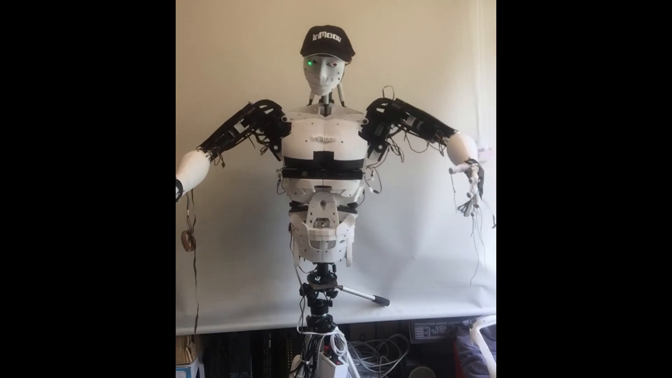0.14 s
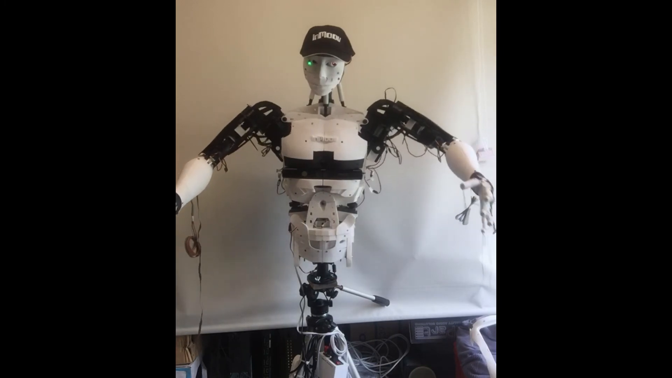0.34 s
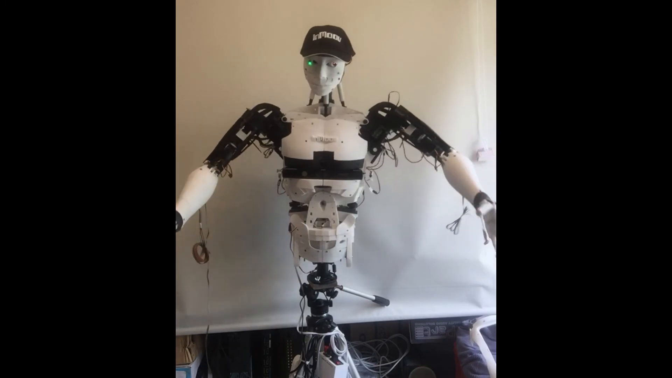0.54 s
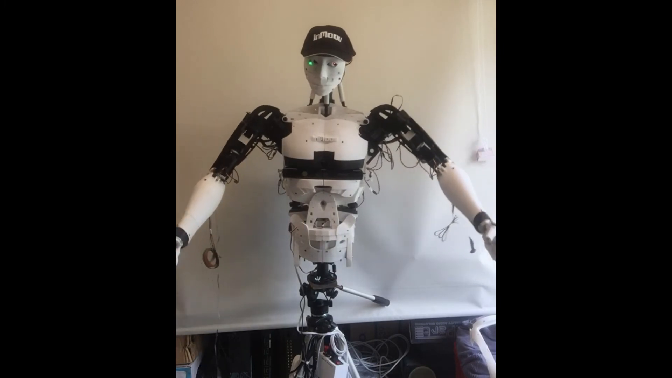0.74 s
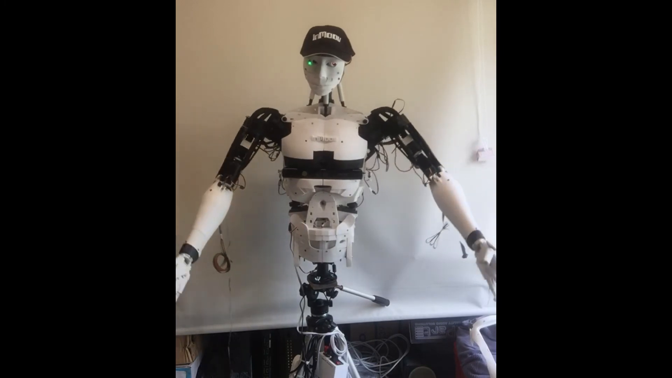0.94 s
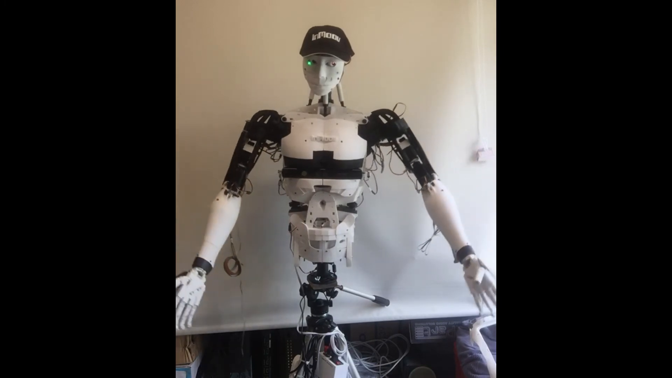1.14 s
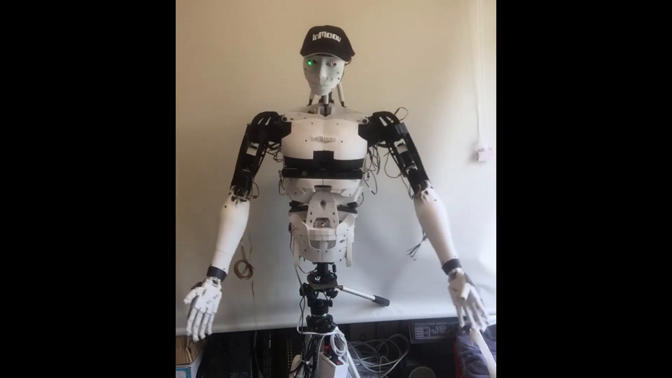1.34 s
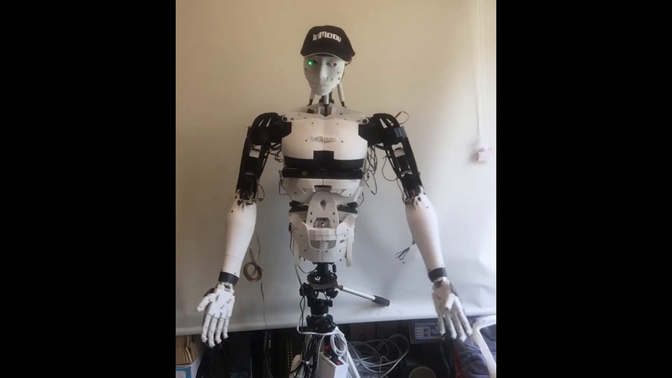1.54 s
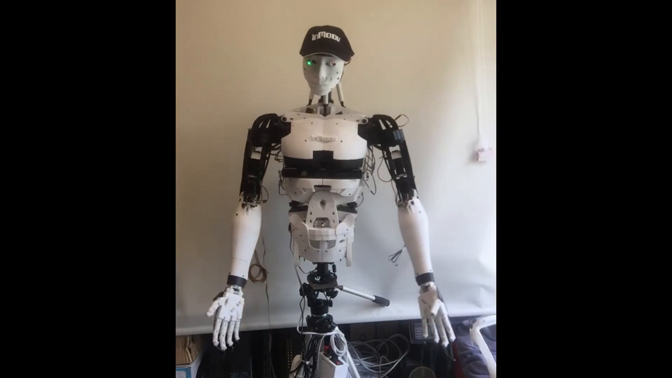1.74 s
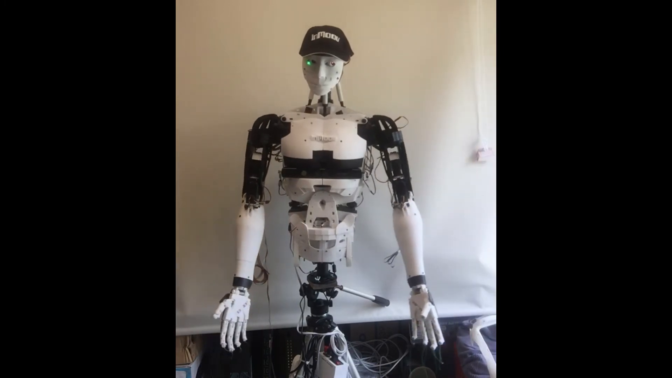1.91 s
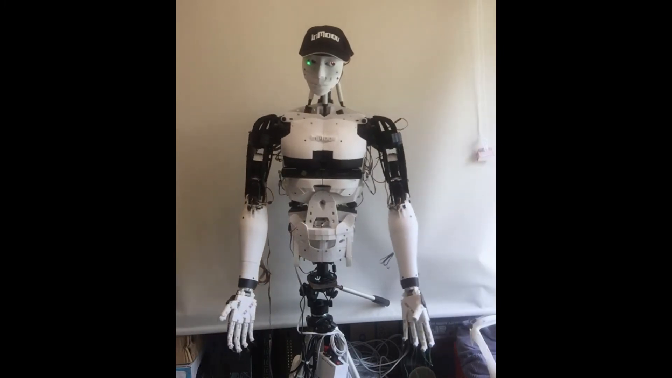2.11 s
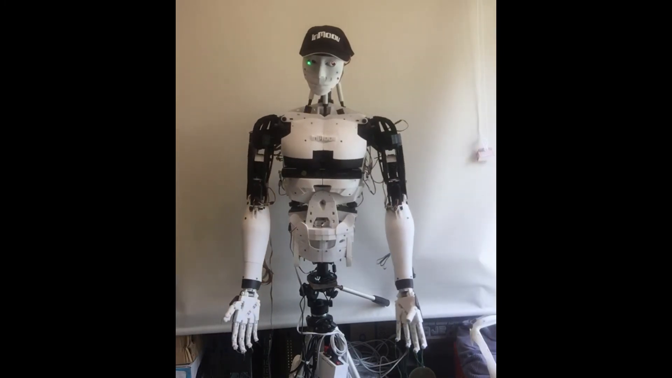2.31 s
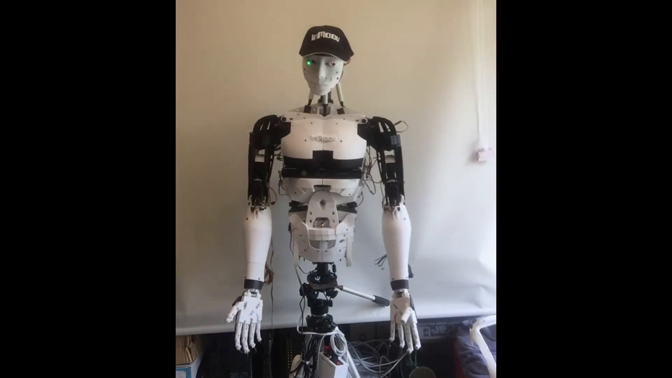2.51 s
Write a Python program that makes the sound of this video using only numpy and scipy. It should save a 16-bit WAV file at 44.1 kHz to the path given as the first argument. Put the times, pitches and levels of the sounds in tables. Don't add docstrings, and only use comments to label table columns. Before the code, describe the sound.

Two electric servos in a robot's arms whir shrilly with gritty gear rattle, then slow to a stop

```python
import sys
import numpy as np
from scipy import signal
from scipy.fft import rfft, irfft
from scipy.io import wavfile
from scipy.ndimage import uniform_filter1d

SR = 44100
rng = np.random.default_rng(int(sys.argv[2]) if len(sys.argv) > 2 else 0)


def store_pcm(level_fs):
    pcm = np.round(np.clip(level_fs, -1, 1) * 32767).astype(np.int16)
    wavfile.write(sys.argv[1], SR, np.atleast_2d(pcm).T)


def to_linear_factor(level_db):
    exponent = np.asarray(level_db, float) / 20
    return 10 ** exponent


N = 114660
T = np.arange(N) / SR
HZ = np.maximum(np.fft.rfftfreq(N, 1 / SR), 1)


def rms_one(x):
    return x / np.sqrt(np.mean(x ** 2) + 1e-20)


def in_time(rows):
    s, *columns = np.transpose(rows)
    return [uniform_filter1d(np.interp(T, s, column), size=1500) for column in columns]


def at_hz(points, hz):
    point_hz, values = np.transpose(points)
    return np.interp(np.log(hz), np.log(point_hz), values)


def drift(rate_hz):
    r = np.exp(-80 * np.pi * rate_hz / SR)
    slow = signal.lfilter([1], [1, -2 * r, r * r], rng.standard_normal(N // 40 + 2002))
    slow = rms_one(slow[2000:])
    return np.interp(np.arange(N) / 40, np.arange(len(slow)), slow)


def coloured(x, db):
    return irfft(rfft(x) * to_linear_factor(db), N)


def band(x, low, high):
    return signal.sosfilt(signal.butter(2, [low, high], "band", fs=SR, output="sos"), x)


def ring(x, hz, width):
    return band(x, hz - width / 2, hz + width / 2)


def lifts_db(bells):
    return sum(db / (1 + (2 * (HZ - hz) / width) ** 2) for hz, width, db in bells)


def whine(mesh_hz, drive_db, levels_db, slopes_db):
    multiples = [.1, .3712, .5, .615, 1, 1.23, 1.5, 2, 2.5]
    jitter, wobble_db, rotor_beat = 0.000992, 3, 0.25
    turns = np.cumsum(mesh_hz * (1 + jitter * drift(41.5))) / SR
    octaves = np.log2(mesh_hz / mesh_hz.max())
    tones = 0
    for multiple, db, slope_db in zip(multiples, levels_db, slopes_db):
        tone_db = db + drive_db + slope_db * octaves + wobble_db * drift(10.3)
        tones = tones + to_linear_factor(tone_db) * np.sin(2 * np.pi * (multiple * turns + rng.random()))
    return tones * (1 + rotor_beat * np.sin(2 * np.pi * turns / 20))


def rattle(speed):
    # (frequency [Hz], gain per doubling [dB])
    speed_law = [(300, 7.5), (1500, 4.5), (2300, 16.5), (3700, -2.5), (5400, -1), (7500, 1), (12000, 6.5)]
    teeth_per_s, tooth_spread_db, patchy_db = 9000, 1, 1.07
    sizes = to_linear_factor(tooth_spread_db * np.minimum(rng.exponential(1, (2, N)), 5))
    sizes = sizes * rng.choice([-1, 1], (2, N))
    chance = teeth_per_s * (speed + 0.14) / SR
    hits = rms_one(sizes * (rng.random((2, N)) < chance) / np.sqrt(chance))
    together, out = drift(6.1), 0
    edges = 200 * 2 ** np.arange(0, 6.6, .5)
    for k, (low, high) in enumerate(zip(edges, edges[1:])):
        db = at_hz(speed_law, np.sqrt(low * high)) * np.log2(speed)
        db = db + patchy_db * (0.6 * together + drift(19))
        out = out + to_linear_factor(db) * band(hits[k % 2], low, high)
    return out


def slow_knocks(speed):
    # (frequency [Hz], width [Hz], level [dB])
    knock_modes = [(5230, 105, 0.5), (3807, 170, -3), (5507, 120, -5)]
    level_db, per_doubling_db, lumpy_db = -16.5, -2.5, 5.5
    rings = 0
    for hz, width, db in knock_modes:
        mode = rms_one(ring(rng.standard_normal(N), hz, width))
        rings = rings + to_linear_factor(db + lumpy_db * drift(25)) * mode
    return to_linear_factor(level_db + per_doubling_db * np.log2(speed)) * rings


def motors():
    # (time [s], main mesh [Hz], whine [dB])
    first_motor = [(.1, 900, -10), (.22, 2150, -7), (.29, 2900, -14), (.36, 3572, 11), (.43, 4080, -6),
                   (.55, 4740, -10), (.65, 4963, -1), (.8, 5100, -1), (.95, 5193, 6.5), (1.07, 5230, 3.5),
                   (1.24, 5220, 6), (1.4, 5160, 2.5), (1.57, 5040, 2), (1.7, 4107, -1), (1.8, 3575, -3),
                   (2.0, 2725, 4), (2.2, 1964, 1), (2.6, 904, -2)]
    # (time [s], main mesh [Hz], whine [dB])
    second_motor = [(.1, 800, -3), (.21, 1900, 5), (.285, 2720, -2), (.38, 3530, 7), (.45, 4040, -3),
                    (.57, 4550, 2.5), (.67, 4790, 0), (.8, 4990, 0), (.95, 5040, 2), (1.07, 5060, 9),
                    (1.25, 4940, 2), (1.35, 4593, -1), (1.5, 3780, 1), (1.6, 3320, 6), (1.8, 2350, -11),
                    (2.2, 902, -9.5), (2.6, 400, -3)]
    # (first motor [dB], second motor [dB], gain per doubling of speed [dB])
    mesh_levels = [(-11.5, -28, 14), (-10.5, -15.5, 13), (-17, -34, 9), (-12.5, -14, 17), (-8.5, -7.5, 2),
                   (-11.5, -29, 1), (-10.5, -6, -1), (-28, -28, -10.5), (-6.5, -9, 12.5)]
    # (time [s], level [dB])
    effort = [(0.08, -53.5), (0.21, -44), (0.25, -35), (0.36, -34), (0.42, -31.5), (0.51, -32.5),
              (0.68, -31.5), (1.06, -32.5), (1.71, -37), (2.09, -44), (2.35, -53), (2.6, -59.5)]
    # (frequency [Hz], density [dB per Hz])
    shell = [(150, -77), (250, -39), (516, -24), (1430, -11.5), (1890, -9), (2760, -5.5), (4790, -5),
             (5130, -2.5), (15500, -15.5)]
    # (frequency [Hz], width [Hz], lift [dB])
    shell_rings = [(353, 103, 13.5), (568, 130, 11.5), (1000, 140, 4.5), (1920, 270, 5), (2680, 440, -6),
                   (3370, 410, 4.5), (3834, 240, 5), (4550, 120, 4), (5520, 117, 3), (5770, 210, 3),
                   (6970, 800, 2), (7880, 200, 6.5), (10220, 900, -2), (11550, 1100, 4.5)]
    # (frequency [Hz], width [Hz], lift [dB])
    flares = [(1644, 51, 14), (1904, 50, 7), (2600, 1040, -3.5), (3470, 120, 3), (3780, 120, 7),
              (4080, 120, 11), (4560, 120, 10.5), (5120, 170, -3.5), (5300, 45, 9.5), (5530, 150, 7),
              (5970, 190, 13), (6400, 440, 7), (7670, 64, 17), (9700, 2300, -10.5)]

    first_hz, first_db = in_time(first_motor)
    second_hz, second_db = in_time(second_motor)
    effort_db, = in_time(effort)
    first_levels, second_levels, slopes = np.transpose(mesh_levels)
    speed = (first_hz + second_hz) / 2 / first_hz.max()
    gain = np.clip((T - .09) / 0.062, 0, 1) * to_linear_factor(effort_db + 6.5)

    tones = whine(first_hz, first_db - 11, first_levels, slopes)
    tones = tones + whine(second_hz, second_db - 10.5, second_levels, slopes)
    shell_db = at_hz(shell, HZ)
    rattling = coloured(gain * rattle(speed), shell_db + lifts_db(shell_rings))
    whining = coloured(gain * tones, shell_db + 3 + lifts_db(flares))
    return rattling + whining + gain * to_linear_factor(-7.5) * slow_knocks(speed)


def holding_servo():
    # (frequency [Hz], width [Hz], level [dB])
    servo_rings = [(1110, 200, -8), (3470, 140, -0.5), (3740, 300, 5), (4040, 140, 0), (5400, 530, -13),
                   (6850, 560, -13.5)]
    pulses_per_s, first_s, end_s, burst_s = 56, -0.0056, 0.12, 0.0046
    age = ((T - first_s) % (1 / pulses_per_s)) / burst_s
    bursts = (age * np.exp(1 - age)) ** 2 * rng.standard_normal(N)
    buzz = sum(to_linear_factor(db) * ring(bursts, hz, width) * np.sqrt(500 / width) for hz, width, db in servo_rings)
    return to_linear_factor(-54.5) * rms_one(buzz) * np.clip((end_s - T) / 0.061, 0, 1)


def joint_ticks():
    # (time [s], peak [dB], tail [dB])
    tick_events = [
        (0.384, -36, -18),
        (0.597, -47, 0),
        (1.4709, -28.5, -8),
        (2.5035, -39, -10.5),
        (2.5083, -40, -9.5),
    ]
    # (frequency [Hz], level [dB])
    tick_colour = [(500, -34), (1000, -1), (2200, 9.5), (3500, 0), (6000, 0), (10000, -1), (16000, -3)]
    crack_s, tail_t60_s = 0.0034, 0.11
    shape = np.zeros(N)
    for s, db, tail_db in tick_events:
        since = np.maximum(T - s, 0)
        decay = np.exp(-since / crack_s) + to_linear_factor(tail_db - 60 * since / tail_t60_s)
        shape += (T >= s) * to_linear_factor(db - 3) * decay
    return coloured(shape * rng.standard_normal(N), at_hz(tick_colour, HZ))


def floor_thud():
    thud_s, thud_hz, rise_s, fall_s = 0.762, 64.4, 0.011, .025
    since = T - thud_s
    swell = np.exp(-(since / np.where(since < 0, rise_s, fall_s)) ** 2 / 2)
    return to_linear_factor(-38) * swell * np.cos(2 * np.pi * thud_hz * since)


def room(x):
    t60_s, level_db = 0.28, -4
    t = T[:SR // 2]
    tail = rng.standard_normal(len(t)) * to_linear_factor(-60 * t / t60_s) * (t > .004)
    tail = tail / np.sqrt(np.sum(tail ** 2))
    return x + to_linear_factor(level_db) * signal.fftconvolve(x, tail)[:N]


def room_tone():
    # (frequency [Hz], density [dB per Hz])
    tone_colour = [(25, -48), (45, -10.5), (65, -2.5), (100, -6.5), (200, -21), (600, -23.5), (2000, -24.5),
                   (15000, -42)]
    noise = rms_one(coloured(rng.standard_normal(N), at_hz(tone_colour, HZ)))
    rumble = signal.sosfilt(signal.butter(2, 130, fs=SR, output="sos"), noise)
    patches = to_linear_factor(-1.5 * drift(9.2))
    return to_linear_factor(-61) * (noise + rumble * (patches - 1))


def scene():
    machine = motors() + holding_servo() + joint_ticks()
    mono = room(machine) + floor_thud() + room_tone()
    return np.array([mono, mono])


def top_cut(x):
    return signal.sosfilt(signal.butter(12, 16600, fs=SR, output="sos"), x)


def record(dry):
    cutoff_hz = 15720
    low_pass = signal.ellip(12, .5, 60, cutoff_hz, fs=SR, output="sos")
    mix = signal.sosfilt(low_pass, dry)
    return top_cut(mix)


dry = scene()
out = record(dry)
store_pcm(out)
```